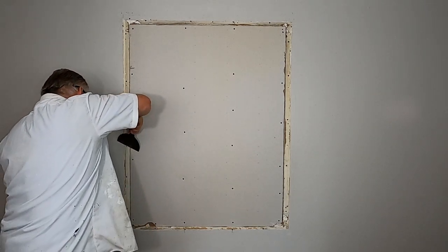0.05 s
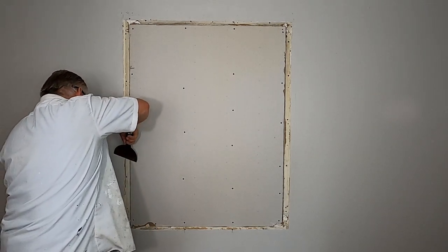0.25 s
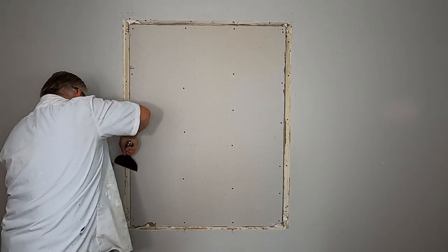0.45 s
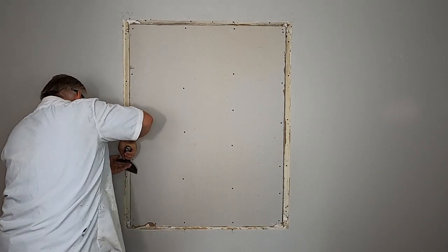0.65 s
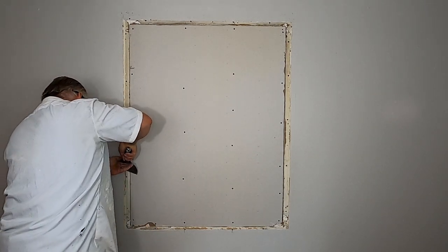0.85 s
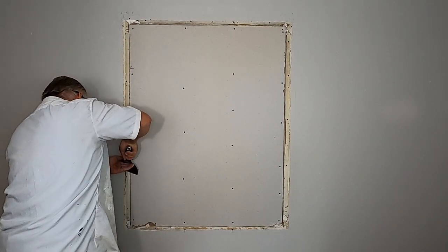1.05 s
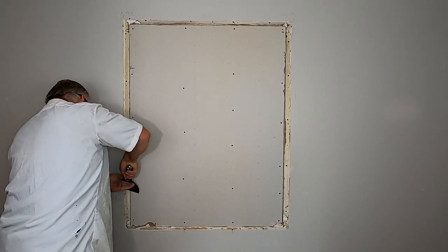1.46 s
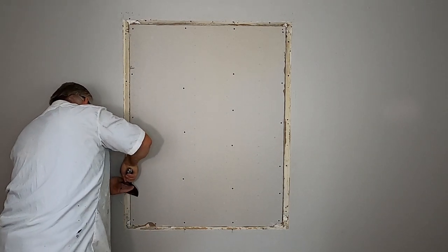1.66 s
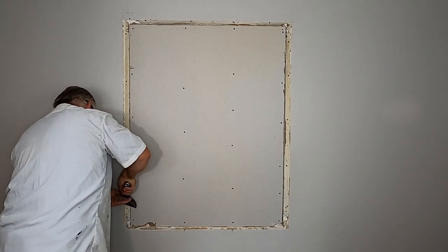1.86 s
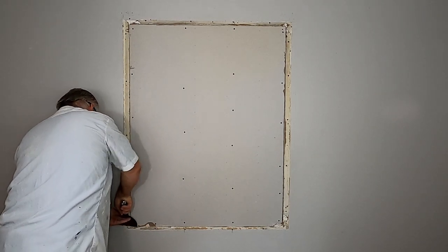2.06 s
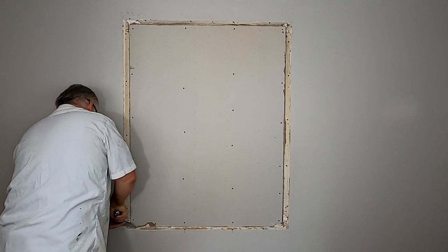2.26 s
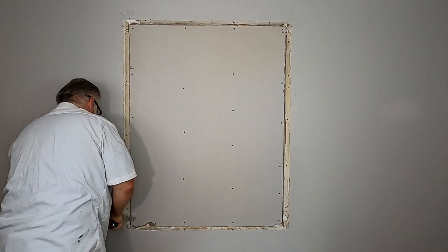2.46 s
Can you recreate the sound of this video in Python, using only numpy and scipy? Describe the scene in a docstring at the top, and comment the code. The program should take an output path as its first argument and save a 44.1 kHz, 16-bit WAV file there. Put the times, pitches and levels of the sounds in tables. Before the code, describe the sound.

A steel hand blade scrapes along a drywall edge in about six short, gritty strokes, with lighter drags and small knocks between them. The bare room rings briefly over a low fan-like hum, heard from a few metres away.

```python
"""A steel hand blade rasps down a drywall edge in six strokes, with lighter drags between them.
Gypsum grit crackles under the steel and drums the board; the blade groans, sings once and knocks
as it is set back, and the panel flexes under the hand. A bare room rings on after each stroke
over a low, fan-like hum, all heard in mono from a few metres away."""
import sys
import numpy as np
from scipy import signal
from scipy.fft import rfft, irfft
from scipy.io import wavfile

SR = 44100
rng = np.random.default_rng(int(sys.argv[2]) if len(sys.argv) > 2 else 0)


def inscribe(sig):
    """Save sig as 16-bit PCM at rate SR to the path in sys.argv[1].

    A 1-D sig is mono; a 2-D sig holds one channel per row.
    Samples are clipped to [-1, 1] before scaling.
    """
    pcm = np.round(np.clip(np.atleast_2d(sig).T, -1, 1) * 32767)
    wavfile.write(sys.argv[1], SR, pcm.astype(np.int16))


N = 114660
HZ = np.fft.rfftfreq(8192, 1 / SR)  # frequency axis of every EQ curve


def amp(db):
    """Decibels to gain."""
    return 10 ** (np.asarray(db) / 20)


def unit(x):
    """Scales to rms 1."""
    return x / np.sqrt(np.mean(x ** 2) + 1e-20)


def curve(points, hz=HZ):
    """Joins breakpoints on a log-frequency axis."""
    corners, values = np.transpose(points)
    return np.interp(np.log(hz + 1), np.log(corners + 1), values)


def add(mix, start, sound):
    """Mixes a sound in at a start time in seconds."""
    part = mix[max(round(start * SR), 0):][:len(sound)]
    part += sound[:len(part)]


def colour(x, db):
    """Minimum-phase EQ with the gains db at the frequencies HZ."""
    log_gain = np.log(amp(np.maximum(db, -100)))
    mirrored = np.r_[log_gain, log_gain[-2:0:-1]]
    taps = np.fft.ifft(np.exp(signal.hilbert(mirrored).conj())).real
    return signal.fftconvolve(x, taps[:len(HZ)])[:len(x)]


def neutral(db):
    """Trims an EQ curve so that white noise keeps its power."""
    return db - 10 * np.log10(np.mean(amp(db) ** 2))


def bump(hz, width_hz):
    """Bell of one resonance, height 1."""
    return 1 / (1 + (2 * (HZ - hz) / width_hz) ** 2)


def wander(size, rate_hz):
    """Random drift of rms 1, rolled off above the given rate."""
    hz = np.fft.rfftfreq(size, 1 / SR)
    return unit(irfft(rfft(rng.standard_normal(size)) / (1 + (hz / rate_hz) ** 4), size))


def tones(partials, width_hz):
    """Sine partials that waver in pitch and level."""
    mix = np.zeros(N)
    for hz, db in partials:
        level = amp(db + 0.2 * wander(N, width_hz))
        pitch = hz + width_hz / 2 * wander(N, rate_hz=25.7)
        mix += level * np.sqrt(2) * np.sin(2 * np.pi * np.cumsum(pitch) / SR)
    return mix


def background(air_db=-36, fade_db_per_s=1.56, linger_db=-29, linger_t60_s=0.21):
    """A fan-like hum that slowly fades, and an earlier scrape dying away at the start."""
    # Room tone EQ: (frequency [Hz], gain [dB])
    air_eq = [(20, 3), (60, -19), (110, -4.5), (165, 3.5), (320, -0.5), (480, 0), (760, -2.5), (900, -1.5),
              (1080, 1), (1500, -8.5), (2700, -18), (4000, -17), (6000, -16.5), (8500, -42), (15000, -55)]
    # Hum partials: (frequency [Hz], starting level [dB])
    hum_partials = [(172, -59), (204, -56.5), (424, -63), (506, -44), (888, -44.5), (1050, -43)]
    t = np.arange(N) / SR
    eq = neutral(curve(air_eq))
    air = amp(air_db) * colour(rng.standard_normal(N), eq)
    bed = (air + tones(hum_partials, width_hz=9.5)) * amp(-fade_db_per_s * t)
    linger = colour(rng.standard_normal(N), eq) * amp(linger_db - 60 * t / linger_t60_s)
    return bed + linger


def room(x, direct_db=-7, early_db=-3.5, early_decay_s=0.0071):
    """Direct sound, close reflections off bare walls and a tail that rings longest in the mids."""
    # Reverb decay: (frequency [Hz], T60 [s])
    decay_times = [(100, 0.44), (500, 0.69), (1400, 0.57), (3700, 0.46), (7000, 0.46), (14000, 0.42)]
    t = np.arange(SR) / SR
    echoes = rng.choice([-1., 1.], SR) * (rng.random(SR) < 4000 / SR)
    hz, frame_s, spectra = signal.stft(echoes, SR, nperseg=256)
    decay = amp(-60 * frame_s / curve(decay_times, hz)[:, None])
    tail = signal.istft(spectra * decay, SR, nperseg=256)[1][:SR]
    early = rng.standard_normal(SR) * (rng.random(SR) < 700 / SR) * np.exp(-t / early_decay_s)
    response = tail / np.linalg.norm(tail) + amp(early_db) * early / np.linalg.norm(early)
    response[0] += amp(direct_db)
    return signal.fftconvolve(x, response / np.linalg.norm(response))[:N]


def moving_room(x, count=4, cycle_s=0.11):
    """The room answers differently as the blade travels: a looping crossfade of room responses."""
    place = np.arange(N) / SR / cycle_s * count
    mix = np.zeros(N)
    for k in range(count):
        distance = abs((place - k + count / 2) % count - count / 2)
        mix += room(x * np.cos(np.pi / 2 * np.minimum(distance, 1)))
    return mix


def push(db, length_s=0.099):
    """The panel flexes under the hand: a soft, deep bump."""
    t = np.arange(SR // 4) / SR
    eq = 30 * np.log10(bump(hz=47.8, width_hz=65))
    flex = unit(colour(rng.standard_normal(len(t)), eq))
    return amp(db) * flex * np.sin(np.pi * np.minimum(t / length_s, 1))


def singing(partials, start, length, width_hz, t60_s=0.49):
    """Friction swells the blade's modes into a note or a groan that dies away with the room."""
    t = np.arange(N) / SR - start
    swell = np.sin(np.pi / 2 * np.clip(2 * t / length, 0, 1))
    decay = amp(-60 * np.maximum(t - length * 0.37, 0) / t60_s)
    return tones(partials, width_hz) * swell * decay


def grit(size, grains_per_s=7000, spread_db=2.5, chatter_hz=170, chatter_db=1.9):
    """Gypsum grains breaking: clicks of uneven size, bunched by the blade's chatter."""
    clicks = (rng.random(size) < grains_per_s / SR) * rng.choice([-1, 1], size)
    sizes = amp(spread_db * np.minimum(rng.exponential(1, size), 4))
    chatter = amp(chatter_db * wander(size, chatter_hz))
    return unit(clicks * sizes * chatter)


def knock(clack_db, thud_db, clack_decay_s=0.016, thud_decay_s=0.025):
    """The blade bites into the board: a short crunch in the steel and a thud in the panel."""
    # Steel clack EQ: (frequency [Hz], gain [dB])
    clack_eq = [(100, -16), (420, 2.5), (850, -16), (1050, 15), (1550, -2.5), (1900, 11), (2200, 0),
                (2750, 10), (3100, -7), (3500, -1), (4100, -14), (4700, 0), (5300, -15), (5900, -3.5),
                (7300, -20.5), (9000, -34), (15000, -42)]
    # Panel thud EQ: (frequency [Hz], gain [dB])
    thud_eq = [(20, -74), (45, -10), (75, 11.5), (110, -1), (250, 0.5), (450, -0.5), (900, -14),
               (4000, -84)]
    t = np.arange(SR // 2) / SR
    clack = colour(grit(len(t)) * np.exp(-t / clack_decay_s), neutral(curve(clack_eq)))
    thud = colour(grit(len(t)) * np.exp(-t / thud_decay_s), neutral(curve(thud_eq)))
    return 2 * (amp(clack_db) * clack + amp(thud_db) * thud)


def dust(length, stroke_db):
    """Fine dust slides under the blade: a soft hiss for as long as it touches the board."""
    # Dust hiss EQ: (frequency [Hz], gain [dB])
    dust_eq = [(100, -14.5), (500, 7.5), (1100, 11.5), (2000, 6.5), (5800, -2.5), (7500, -11), (9500, -23),
               (12800, -22), (15500, -28)]
    t = np.arange(SR // 2) / SR
    touch = np.sqrt(np.abs(np.sin(np.pi * np.minimum(t / length, 1))))
    level = amp(-22 + 0.5 * stroke_db)  # half tracks the stroke, so even a light touch hisses
    return level * colour(grit(len(t)) * touch, neutral(curve(dust_eq)))


def board(edge_hz, shelf_db=10.5, shelf_width_hz=66):
    """The scrape's EQ with the resonances of board and blade, shelved down above edge_hz."""
    # Broad scrape EQ: (frequency [Hz], gain [dB])
    scrape_eq = [(20, -9), (40, -12), (80, -19.5), (140, -4), (210, -6), (300, -7), (450, 5.5), (700, 3),
                 (1050, 3.5), (1500, 3.5), (1800, 2.5), (2200, 3.5), (2750, 7.5), (3450, 2.5), (4200, -0.5),
                 (5000, 0), (5900, 2.5), (7300, -9), (9500, -28.5), (12500, -26.5), (15500, -41.5)]
    # Peaks and notches of board and blade: (frequency [Hz], width [Hz], gain [dB])
    resonances = [(214, 11, 6), (418.3, 8.3, 12), (510, 8.3, -2.5), (738, 8, 0.5), (986, 210, 4.5),
                  (1424, 17, -11), (1587, 91, 1.5), (1746, 16, 8), (1900, 35, 3), (2170, 10, -14.5),
                  (2834, 10, -25), (2810, 26, -12), (3200, 65, -0.5), (3440, 25, 4)]
    body = sum(db * bump(hz, width) for hz, width, db in resonances)
    shelf = shelf_db * (1 + np.tanh((HZ - edge_hz - shelf_width_hz) / (2 * shelf_width_hz))) / 2
    return neutral(curve(scrape_eq) + body - shelf)


def stroke(rise, hold, release, db, bass_db, hollow_db, body_db, treble_db, ring_hz, ring_db, edge_hz):
    """The blade speeds up, runs and stops; grit drives the board, brighter at speed."""
    # Stroke EQ corners for bass, hollow, body twice, flat twice and treble: (frequency [Hz])
    corners = (220, 430, 800, 1150, 1700, 3100, 4400)
    t = np.arange(SR // 2) / SR

    def speed(lag_s):
        """Blade speed from 0 to 1, delayed by lag_s."""
        return np.clip(np.minimum((t - lag_s) / rise, 1 - (t - lag_s - rise - hold) / release), 0, 1)

    grip = curve(list(zip(corners, (bass_db, hollow_db, body_db, body_db, 0, 0, treble_db))))
    eq = board(edge_hz) + grip + ring_db * bump(ring_hz, width_hz=92)
    grains = grit(len(t))
    lows, below_hiss = (signal.filtfilt(*signal.butter(2, hz, fs=SR), grains) for hz in (2100, 3200))
    # The board drums first; rasp and hiss follow as grit breaks loose.
    drum = lows * speed(lag_s=0) ** 0.68
    rasp = (below_hiss - lows) * speed(lag_s=0.0024) ** 0.84
    hiss = (grains - below_hiss) * speed(lag_s=0.014) ** 0.98
    return amp(db) * colour(drum + rasp + hiss, eq)


def scene(dust_lead_s=0.012, low_cut_hz=21):
    """Strokes and knocks in the room, with singing, groans and pushes over the hum, in dual mono."""
    # Blade strokes: (start [s], rise [s], hold [s], release [s], level [dB], bass [dB], hollow [dB],
    # body [dB], treble [dB], blade ring [Hz], ring gain [dB], top edge [Hz])
    strokes = [ (.118, 0.0082, 0.0086, 0.022, -39, 9, -4, -2, 5, 5200, 2, 6100),
               (0.208, 0.0088, 0.0084, 0.041, -22.5, 2, 8.5, 5, 4, 3040, -6, 6240),
               (.230, 0.016, 0.061, 0.051, -16, 14, 3, 2.5, -2.5, 1806, 10, 6200),
               (0.53, 0.038, 0.054, 0.093, -14, 0.5, -6, -3.5, -0.5, 2530, 2.5, 5900),
               (0.747, 0.033, 0.031, 0.027, -23, -15, -1, -6.5, -5.5, 2750, -15, 5740),
               (0.924, 0.023, 0.023, 0.052, -34.5, 9, 14.5, 5.5, -0.5, 1180, 8, 5800),
               (1.181, 0.054, 0.05, 0.064, -16.5, 4.5, 1, -1, 2, 2610, 3.5, 5930),
               (1.358, 0.037, 0.018, 0.049, -30.5, 14.5, 11.5, 2, -5, 1930, 5, 6400),
               (1.492, 0.051, 0.067, 0.05, -16.5, 1.5, -4.5, 3.5, 1, 1130, -1.5, 6120),
               (1.657, 0.012, 0.0099, 0.018, -24.5, 5, -7, -5, -20, 2000, 10, 6100),
               (1.77, 0.057, 0.04, 0.062, -15.5, -12, -8.5, 1, 2.5, 3030, 6, 6200),
               (1.954, 0.024, 0.014, 0.023, -30, 8.5, -9, -2.5, 3.5, 2630, -12, 6000),
               (2.063, 0.045, 0.11, 0.035, -18, -6.5, -3.5, -0.5, 2, 1226, 5, 6220), ]
    # Blade knocks on the board: (time [s], relative clack level [dB], relative thud level [dB])
    knocks = [(.216, -26.5, -37), (.994, -21, -26), (1.020, -24, -30.5), (1.216, -34, -30.5),
              (1.521, -35, -30.5), (1.802, -26, -30), (2.215, -22.5, -27), (2.554, -50, -67)]
    # Modes of the singing blade: (frequency [Hz], level [dB])
    blade_modes = [(1728, -31), (2487, -24), (2827, -30), (3731, -31), (4427, -36), (5153, -33)]
    # Groans of the dragging blade: (start [s], length [s], pitch [Hz], level [dB])
    groans = [(0.243, 0.025, 208, -20), (0.252, 0.12, 421.5, -29.5), (1.237, 0.16, 467, -36),
              (1.25, 0.11, 724.8, -29), (1.487, .1, 765, -31.5), (1.826, 0.028, 715, -27),
              (2.063, 0.03, 712, -28.5), (2.162, 0.05, 1206, -24.5)]
    # Hand pushes as a stroke starts: (time [s], level [dB])
    pushes = [(0.252, -38), (.535, -39), (.96, -42), (1.2, -38), (1.49, -41), (1.751, -39), (2.04, -48)]
    work = np.zeros(N)
    for start, rise, hold, release, db, *tone in strokes:
        add(work, start, stroke(rise, hold, release, db, *tone))
        add(work, start - dust_lead_s, dust(dust_lead_s + rise + hold + release, db))
    for start, clack_db, thud_db in knocks:
        add(work, start, knock(clack_db, thud_db))
    mix = moving_room(work) + background()
    mix += singing(blade_modes, start=0.578, length=0.12, width_hz=6.6)
    for start, length, hz, db in groans:
        mix += singing([(hz, db)], start, length, width_hz=21.7)
    for start, db in pushes:
        add(mix, start, push(db))
    low_cut = signal.butter(2, low_cut_hz, "high", fs=SR)
    return np.tile(signal.lfilter(*low_cut, mix), (2, 1))


def record(dry):
    """A soft clip rounds off the loudest peaks; a steep low-pass trims the very top."""
    ceiling, cutoff_hz = 0.57, 15750
    rounded = dry / (1 + (dry / ceiling) ** 10) ** (1 / 10)
    low_pass = signal.firwin(511, cutoff_hz, window=("kaiser", 9), fs=SR)
    return signal.oaconvolve(rounded, low_pass[None], "same")


dry = scene()
out = record(dry)
inscribe(out)
```